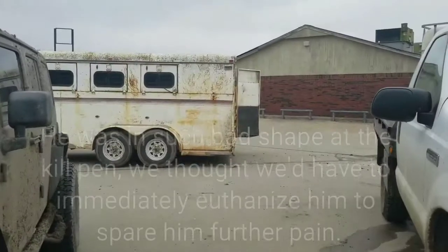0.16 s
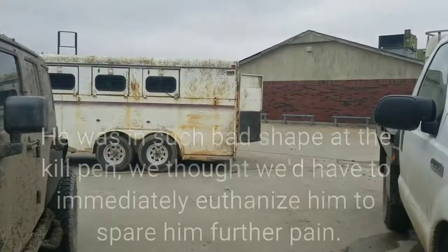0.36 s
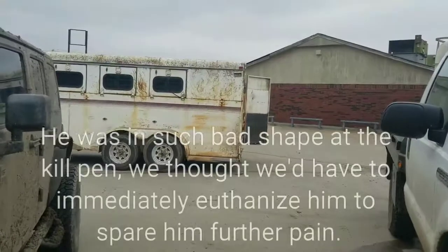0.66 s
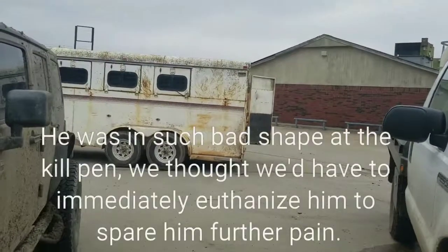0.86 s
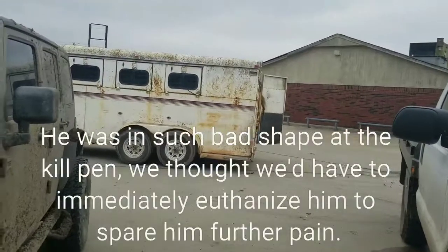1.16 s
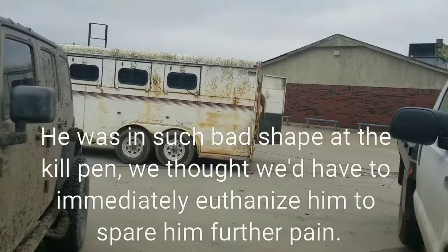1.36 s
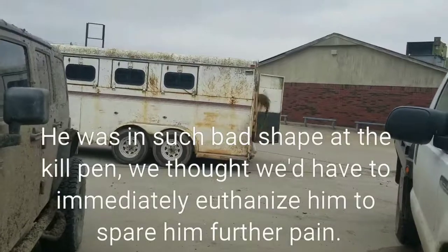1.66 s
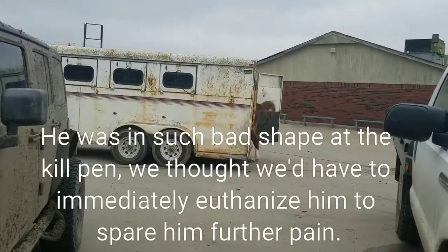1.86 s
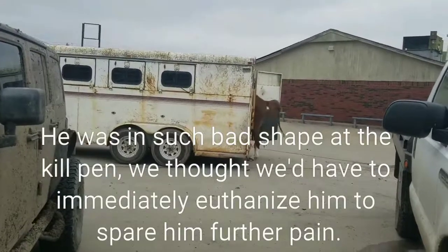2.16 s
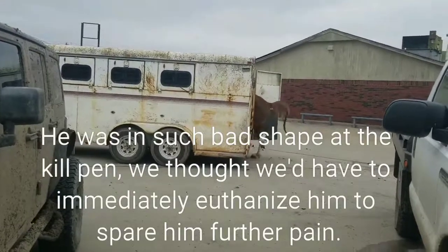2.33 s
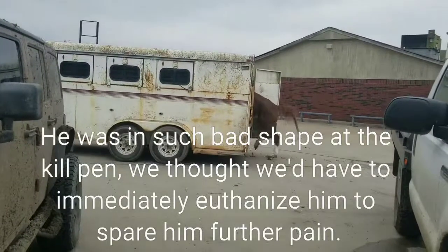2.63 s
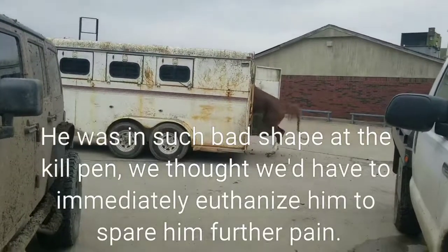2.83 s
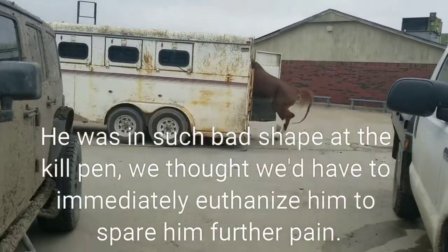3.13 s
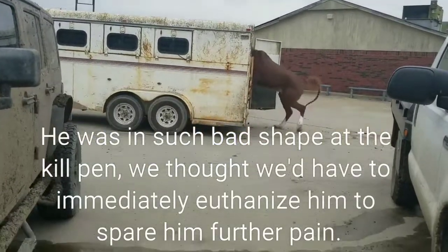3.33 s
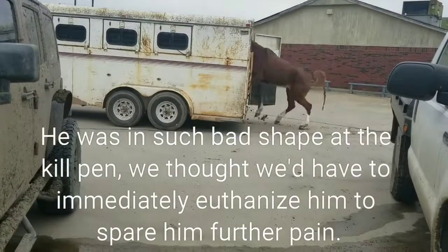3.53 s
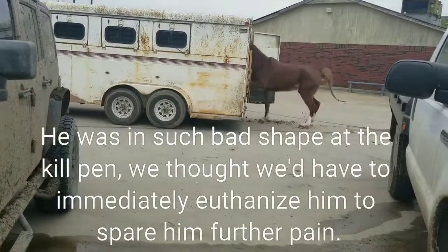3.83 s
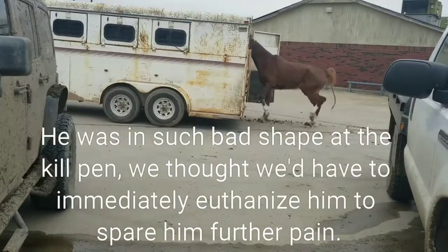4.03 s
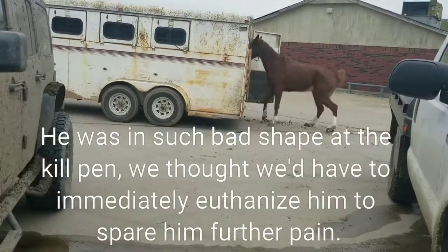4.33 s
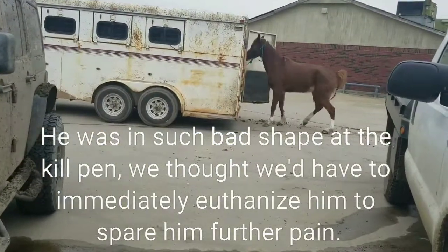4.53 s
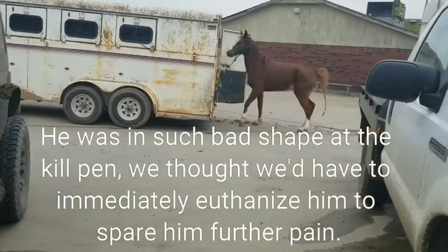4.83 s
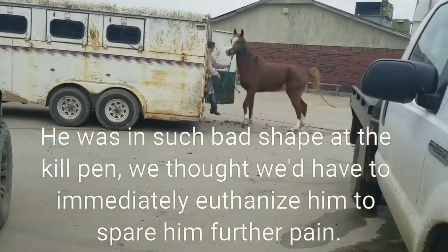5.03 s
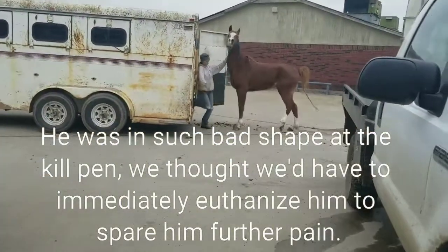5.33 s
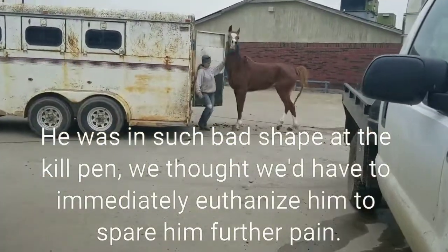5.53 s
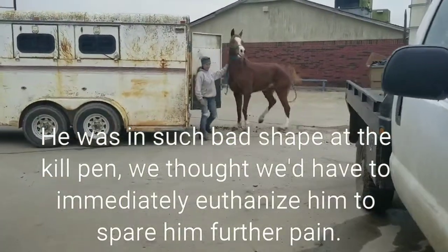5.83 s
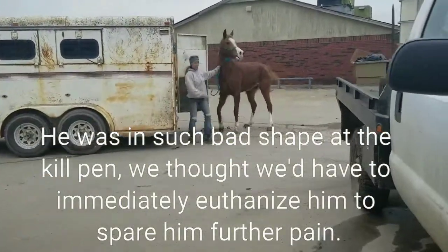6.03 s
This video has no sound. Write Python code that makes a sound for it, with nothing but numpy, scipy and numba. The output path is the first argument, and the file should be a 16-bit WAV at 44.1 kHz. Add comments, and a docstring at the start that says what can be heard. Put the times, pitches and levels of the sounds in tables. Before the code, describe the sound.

A handheld microphone stands some way off in a yard between parked vehicles. Hooves thump and rattle a steel trailer, the loudest blow at about one second, followed by sharp metal clanks and lighter steps. The horse cries out with a piercing whistle that breaks into raspy shakes and drops to a low snorting nicker. After a short metallic tick it whinnies again, higher and brighter, still calling at the end. Walls return brief echoes over soft low rumble.

```python
"""A paved yard: a horse backs out of a steel stock trailer. Hooves thump, steel clanks and squeals, and it whinnies twice.
Thumps are noise bursts in many bands plus panel tones; clanks are short coloured noise; the squeal is a wavering sine.
A whinny joins a high whistle with harmonics to slower, ragged fold pulses that rasp through throat and nose; the first
sinks into a nicker. Walls and parked trucks echo it all, over an outdoor rumble of noise and a distant engine's sine."""
import sys
import numpy as np
from scipy import signal
from scipy.fft import rfft, irfft, next_fast_len
from scipy.io import wavfile
from scipy.ndimage import uniform_filter1d
from numba import njit

SR = 44100
rng = np.random.default_rng(int(sys.argv[2]) if len(sys.argv) > 2 else 0)


def waveform_to_disk(signal):
    """Save audio, clipped to [-1, 1], as 16-bit WAV at the path in sys.argv[1]."""
    frames = np.transpose(np.atleast_2d(signal))
    scaled = np.clip(frames, -1, 1) * 32767
    samples = np.round(scaled).astype(np.int16)
    wavfile.write(sys.argv[1], SR, samples)


N = 273067
T = np.arange(N) / SR  # time in seconds


def undb(db):
    """Turn decibels into gain."""
    return 10 ** (np.asarray(db) / 20)


def unit(x):
    """Scale to an average (rms) level of 1."""
    return x / np.sqrt(np.mean(x ** 2) + 1e-18)


def steady(x):
    """Even out the slow swells, keeping the grain."""
    power = np.abs(uniform_filter1d(x ** 2, size=1800))
    return x / np.sqrt(power + 1e-12)


def curves(table):
    """Join each column of a table by straight lines in time."""
    s, *columns = np.transpose(table)
    return [np.interp(T, s, column) for column in columns]


def during(table):
    """A gate with soft edges, open over the time span of a table."""
    is_open = (T > table[0][0]) & (T < table[-1][0] + .01)
    return uniform_filter1d(1. * is_open, size=300)


def at(points, hz):
    """Read a curve of (Hz, value) points, with pitch on a log scale."""
    f, value = np.transpose(points)
    return np.interp(np.log(hz + 1), np.log(f), value)


def colour(x, points):
    """Filter a sound by a curve of (Hz, dB) points."""
    length = x.shape[-1]
    size = next_fast_len(length)
    gain = undb(at(points, np.fft.rfftfreq(size, 1 / SR)))
    return irfft(rfft(x, size) * gain, size)[..., :length]


def walk(rate):
    """Smooth random motion with spread 1; a higher rate (Hz) moves faster."""
    size = max(int(SR / rate), 2)
    smooth = uniform_filter1d(rng.standard_normal(N), size)
    return unit(uniform_filter1d(smooth, size))


def add(out, s, sound):
    """Mix a sound in at time s."""
    start = int(s * SR)
    out[..., start:start + sound.shape[-1]] += sound[..., :N - start]


def stereo_noise(count, wide_hz):
    """Noise that is alike left and right in the bass and much less alike in the treble."""
    mid, side = rng.standard_normal((2, count))
    side = colour(side, [(wide_hz / 16, -22), (wide_hz, -2), (wide_hz * 2, -1)])
    return np.array([mid + side, mid - side])


# The tone colour of the outdoor rumble. Each row: pitch in Hz, relative strength in dB.
RUMBLE_COLOUR = [(25, -22.5), (60, 0.5), (90, 2.5), (240, -0.5), (450, -14), (700, -11.5), (1270, -14),
                 (2000, -18.5), (3200, -32), (5000, -39), (7500, -41), (9000, -61.5), (14500, -42.5)]
# How loud the rumble is. Each row: time in seconds, level in dB before a slight random sway.
RUMBLE_LEVEL = [(0, -38), (.9, -41), (1.5, -42.5), (2.4, -43.5), (3.2, -43.5), (3.8, -43.5), (4.5, -44),
                (5.1, -49.5), (5.6, -46.5), (6.19, -46)]
# How loud the distant engine is. Each row: time in seconds, level in dB before a random sway.
DRONE_LEVEL = [(0, -43.5), (2.999, -45.5), (4.901, -66), (5.301, -50), (5.7, -39), (6.19, -44.5)]
DRONE_HZ = 76


def yard():
    """Outdoor rumble of coloured noise, with a wavering low sine for an engine droning far off."""
    rumble = unit(colour(stereo_noise(N, wide_hz=1585), RUMBLE_COLOUR))
    rumble = rumble * undb(curves(RUMBLE_LEVEL)[0] + 0.55 * walk(25))
    drone_hz = DRONE_HZ * (1 + 0.056 * walk(25))
    drone = np.sin(2 * np.pi * np.cumsum(drone_hz) / SR)
    drone = drone * undb(curves(DRONE_LEVEL)[0] + 1.4 * walk(11))
    return (rumble + drone) * undb(np.array([[.9], [-.9]]))  # a little louder on the left


# How loud the thin metallic squeal is. Each row: time in seconds, level in dB before a random sway.
SQUEAL_LEVEL = [(0, -54), (.3, -44), (.65, -74)]
SQUEAL_HZ = 5810


def squeal():
    """A faint sine with a wavering pitch that swells and dies away."""
    hz = SQUEAL_HZ * (1 + 0.0036 * walk(220))
    tone = np.sin(2 * np.pi * np.cumsum(hz) / SR)
    return tone * undb(curves(SQUEAL_LEVEL)[0] + 2 * walk(27)) * during(SQUEAL_LEVEL)


# Hoof blows on the trailer floor and the pavement.
# Each row: start in seconds, relative level in dB, brightness in dB an octave (tilting about 1000 Hz).
HOOF_BLOWS = [(.418, -31.5, -1), (.501, -38.5, -3.5), (1.016, -27, -5), (1.036, -17.5, 2),
              (1.048, -34, -15), (1.567, -32, 0), (1.614, -30.5, -3.5), (1.683, -33.5, 4.5),
              (1.776, -35, -1), (2.193, -35, -4.5), (2.291, -41.5, 4), (2.601, -36.5, -3),
              (2.842, -44.5, -5.5), (3.089, -33.5, -3.5), (3.323, -41, -7.5), (3.764, -32.5, 6)]
# How strongly the trailer body answers a blow. Each row: pitch in Hz, relative strength in dB.
BODY_COLOUR = [(40, -30), (70, 4), (130, 6.5), (280, 1), (600, 5.5), (1100, 5), (1800, -4), (2700, -31),
               (4500, -14.5), (7500, -70.5), (10000, -56.5), (15000, -43.5)]
# How long the body rings. Each row: pitch in Hz, seconds to fade by 60 dB.
BODY_FADE = [(60, 1), (200, 0.75), (600, 0.29), (1500, 0.17), (4000, 0.02), (12000, 0.25)]
# Distinct tones of the panels. Each row: pitch in Hz, relative strength in dB, seconds to fade by 60 dB.
PANEL_TONES = [(593.6, -8.5, 0.1), (662.3, -5.5, 0.17), (890, -5.5, 0.087), (1080, -17.5, 0.088),
               (1304, -3, 0.17), (1840, -9.5, 0.059)]


def hooves(panel_db, boom_db, crack_db, clatter_db):
    """Each blow sets the steel box rattling: dense modes that fade band by band, and a few distinct panel tones."""
    out, t = np.zeros((2, N)), T[:SR]
    centres = 45 * 2 ** (np.arange(17) / 2)  # half-octave bands, in Hz
    filters, fades = [], []
    for f in centres:
        edges = [f / 2 ** (1 / 4), f * 2 ** (1 / 4)]
        filters.append(signal.butter(2, edges, "band", fs=SR, output="sos"))
        t60 = at(BODY_FADE, f)
        # a quieter boom lingers twice as long
        fades.append(undb(-60 * t / t60) + undb(boom_db - 30 * t / t60))
    for s, db, bright_db in HOOF_BLOWS:
        noise = stereo_noise(len(t), wide_hz=1400)
        rattle = 0
        for f, band, fade in zip(centres, filters, fades):
            strength = undb(at(BODY_COLOUR, f) + bright_db * np.log2(f / 1000))
            rattle = rattle + strength * signal.sosfilt(band, noise) * fade
        ring = 0
        for f, g, t60 in PANEL_TONES:
            ring = ring + undb(g - 60 * t / t60) * np.sin(2 * np.pi * f * t) * rng.normal()
        clatter = undb(clatter_db * walk(240)[:SR])  # random unevenness
        crack = 1 + undb(crack_db - 60 * t / 0.0546)  # extra strength at the start
        contact = 1 - np.exp(-t / 0.00028)
        rattle = rattle / rattle[:, t < .02].std()
        ring = ring / ring[t < .02].std()
        add(out, s, undb(db) * contact * clatter * crack * (rattle + undb(panel_db) * ring))
    return out * undb(np.array([[1.0], [-1.0]]))  # a little louder on the left


# Steel fittings that clank and scrape.
# Each row: start in seconds, level in dB before fading, seconds to fade by 60 dB, brightness in dB an octave.
CLANK_HITS = [(.705, -15.5, 0.013, -8), (1.568, -31, 0.16, -4), (1.611, -11, 0.066, -4.5),
              (1.779, -40.5, 0.2, -1), (2.248, -51, .15, 12), (2.268, -37.5, 0.12, 2.5),
              (2.293, -38.5, 0.091, 3.5), (4.532, -21.5, .11, 3), (4.874, -47, 0.076, 3),
              (5.101, -36.5, 0.024, -3)]
# The tone colour of the steel. Each row: pitch in Hz, relative strength in dB before brightening.
STEEL_COLOUR = [(710, -37), (1200, -15), (1750, -11), (1940, -0.5), (3070, -2), (3900, 11), (5850, -3),
                (6300, 6.5), (7290, 5), (8170, -1.5), (14500, -7.5)]


def clanks():
    """Steel rings in short bursts: noise coloured with peaks, which starts fast and fades."""
    out, t = np.zeros(N), T[:SR // 2]
    for s, db, t60, bright_db in CLANK_HITS:
        tilted = [(f, g + bright_db * np.log2(f / 1000)) for f, g in STEEL_COLOUR]
        ring = unit(colour(rng.standard_normal(len(t)), tilted))
        add(out, s, ring * undb(db - 60 * t / t60) * (1 - np.exp(-t / .003)))
    return out


@njit
def band_pass(x, hz, width):
    """One resonance (a state-variable band-pass filter) whose centre may move."""
    y, band, low = np.empty(len(x)), 0., 0.
    for i in range(len(x)):
        g, k = np.tan(np.pi * hz[i] / SR), width / hz[i]
        v = (band + g * (x[i] - low)) / (1 + g * (g + k))
        band, low, y[i] = 2 * v - band, low + 2 * g * v, k * v
    return y


def resonate(x, hz, width):
    """Apply one moving resonance twice, for steep skirts."""
    return band_pass(band_pass(x, hz, float(width)), hz, float(width))


# Resonances of throat and nose: head inside the trailer, raised outside, and the slack throat of the nicker.
# Each row: pitch in Hz before trembling, width of each pass in Hz, relative strength in dB.
TRACT_INSIDE = [(1010, 140, -15), (1529, 700, -7), (2100, 190, 4.5), (2760, 368, -4), (3538, 2400, -6.5),
                (4680, 204, 3), (5930, 1450, -20)]
TRACT_OUTSIDE = [(1205, 264, -5.5), (1718, 300, 0), (2203, 237, 2), (3320, 510, -4.5), (4230, 740, -14.5),
                 (6520, 3400, -19)]
TRACT_NICKER = [(1090, 450, -1), (1898, 200, -0.5), (3175, 950, -1.5), (4700, 1455, -15)]


def throat(source, tract, wander):
    """Jaw and nostrils tremble, so each resonance wanders."""
    total = 0
    for k, (f, width, db) in enumerate(tract):
        hz = f * (1 + np.clip(wander * walk(3.5), -.2, .2))
        total = total + (-1) ** k * undb(db) * resonate(source, hz, width)
    return steady(total)


# Shakes of the voice, mostly six to ten a second. Each row: middle in seconds, length in seconds,
# whistle bend in Hz, whistle change in dB, nasal tone in dB before an overall gain.
SHAKES_FIRST = [(3.052, 0.049, -100, -3, -60), (3.15, 0.059, -220, -4, -48), (3.247, 0.054, -200, 0, -59),
                (3.342, 0.036, -165, 1, -48.5), (3.45, 0.044, -155, -6.5, -36.5),
                (3.563, 0.052, -140, -10.5, -30), (3.685, 0.052, -160, -5, -27),
                (3.822, 0.058, -220, -16, -22.5), (3.953, 0.074, -190, -19, -23),
                (4.068, .035, -88, 1, -28), (4.18, 0.069, 0, 0, -40.5), (4.34, 0.089, 0, 0, -33.5),
                (4.5, 0.083, 0, 0, -35), (4.68, .11, -15.5, 0, -39.5)]
SHAKES_SECOND = [(5.602, 0.06, 117.6, 4, -35.5), (5.722, 0.07, 143.9, 6.5, -33.5),
                 (5.87, 0.064, 164.5, -0.5, -35.5), (6.008, .072, 191.6, 5.5, -38),
                 (6.16, 0.044, 140, -7.5, -38.5)]
FOLD_DROP, FOLD_SAG_PER_S = .14, 1.7  # share the slow folds drop mid-shake, and how fast they keep sinking
FOLD_LAG_S = .008  # the folds follow a shake late
RECOVER_S = .04  # the whistle regains its pitch after a shake


def shaking(shakes, edge, slump_hz):
    """Smooth pushes bend the whistle, lower the folds and open the nose; with slump_hz, each leaves it flatter."""
    push, bend_hz, change_db, nasal, drop = np.zeros((5, N))
    for k, (s, length, hz, db, nose_db) in enumerate(shakes):
        shape = np.exp(-np.minimum(np.abs(2 * (T - s) / length), 10) ** edge)
        recovery = np.exp(-np.maximum(T - s - length / 2, 0) / RECOVER_S)
        after = (T > s) * (1 - shape) * recovery
        push += shape
        bend_hz += hz * shape - (k + 1) * slump_hz * after
        change_db += db * shape
        nasal += undb(nose_db) * shape ** 2
        held = uniform_filter1d(1. * (np.abs(T - s - FOLD_LAG_S) < .65 * length), size=500)
        drop += held * (FOLD_DROP + FOLD_SAG_PER_S * (T - s))
    return push, bend_hz, change_db, nasal, drop


# The arc of each whinny's whistle before it is shaken. Each row: time in seconds, pitch in Hz,
# relative level of the lowest tone in dB, relative level of the harmonics in dB.
CRY_FIRST = [(2.495, 1365, -18.5, -44.5), (2.575, 1588, -25.5, -31.5), (2.7, 1714, -15, -22),
             (2.86, 1775, -12.5, -15.5), (2.92, 1741, -17, -21), (3.0, 1707, -27, -22),
             (3.045, 1491, -23, -19), (3.2, 1325, -25.5, -32), (3.3, 1534, -24, -20),
             (3.41, 1752, -15, -20.5), (3.52, 1804, -13.5, -17), (3.755, 1847, -17.5, -24),
             (3.886, 1722, -14.5, -26.5), (4.02, 1595, -13, -28.5), (4.1, 1501, -44, -65)]
CRY_SECOND = [(5.2, 1234, -53, -75), (5.24, 1660, -37.5, -63), (5.265, 1781, -18.5, -44),
              (5.305, 1809, -19, -50), (5.35, 1827, -40, -59), (5.46, 1866, -23.5, -35.5),
              (5.68, 1928, -16.5, -56), (5.82, 1884, -18.5, -42), (6.07, 1864, -28, -62),
              (6.19, 1927, -19, -56)]
# How the throat colours the whistle's harmonics. Each row: pitch in Hz, relative strength in dB.
HARMONIC_COLOUR = [(2150, 15.5), (2450, -8), (2850, 4.5), (3500, 7.5), (4600, 6), (5300, -6.5),
                   (7000, -2.5), (8700, -17.5), (10500, -19.5), (14000, -29)]
ONSET_S = 0.011  # the whistle starts to speak
DULLS_AFTER_S, DULLING_DB_PER_S = 0.93, 2.5  # late in a call the harmonics tilt: rate per harmonic step


def whistle(cry, bend_hz, change_db, fold_phase, rough, jitter, coupling, shimmer, patchy_db):
    """The high source; slow folds shake its pitch and strength, adding sidebands, and roughness breaks up harmonics."""
    hz, first_db, harmonics_db = curves(cry)
    hz = (hz + bend_hz) * (1 + 0.0023 * walk(73.0) + jitter * rough * walk(527))
    phase = 2 * np.pi * np.cumsum(hz) / SR + coupling * rough * np.sin(fold_phase)
    elapsed = T - cry[0][0]
    dull_db = DULLING_DB_PER_S * np.clip(elapsed - DULLS_AFTER_S, 0, 1)
    upper = 0
    for k in range(2, 9):
        level_db = at(HARMONIC_COLOUR, k * hz) - (k - 3.5) * dull_db + patchy_db * rough * walk(52)
        upper = upper + undb(level_db) * np.sin(k * phase)
    tone = np.sqrt(2) * (undb(first_db) * np.sin(phase) + undb(harmonics_db) * upper) * undb(change_db)
    onset = np.clip(elapsed / ONSET_S, 0, 1)
    unsteady = 1 + rough * (shimmer * walk(250) + coupling * np.cos(fold_phase))
    return tone * unsteady * onset * during(cry)


# The slow folds and the breath through each whinny. Each row: time in seconds, pitch in Hz before shaking,
# roughness from 0 to 1, relative rasp level in dB, relative air hiss level in dB.
EFFORT_FIRST = [(2.49, 597, 0.13, -63, -91), (2.601, 604.3, 0.09, -41.5, -40),
                (2.98, 595, 0.17, -45.5, -38), (3.052, 631.3, 0.47, -40.5, -51),
                (3.301, 607, 0.43, -46, -46), (3.5, 590.6, 0.43, -33.5, -35),
                (4.04, 589.5, 0.45, -35, -36.5), (4.11, 289.4, 0.71, -44.5, -41.5),
                (4.17, 566.8, .55, -39.5, -37), (4.25, 260.3, 0.82, -46, -39),
                (4.36, 134.3, .9, -44.5, -40), (4.55, 100.5, 0.86, -51.5, -44),
                (4.7, 70.47, 0.61, -62.5, -55), (4.85, 64.8, 0.26, -115, -65.5)]
EFFORT_SECOND = [(5.13, 200, .9, -67, -60), (5.19, 489, .7, -48, -51), (5.25, 612.6, 0.5, -47, -69),
                 (5.299, 575.7, 0.36, -37.5, -38), (5.36, 610, 0.49, -35.5, -75),
                 (5.509, 568.2, 0.53, -31, -58), (5.8, 601, 0.28, -32.5, -49.5),
                 (6.08, 624.7, 0.3, -39, -54.5), (6.19, 591, 0.49, -37.5, -54.5)]
# The nasal tone that carries on between shakes. Each row: time in seconds, relative level in dB.
NASAL_FIRST = [(3.0, -51), (3.87, -85), (4.0, -45), (4.13, -30), (4.28, -35), (4.6, -45), (4.85, -58.5)]
NASAL_SECOND = [(5.13, -55), (5.19, -40), (5.25, -61.5), (5.53, -42.5), (5.8, -48), (6.19, -48)]
# The tone colour of air through the nostrils. Each row: pitch in Hz, relative strength in dB.
AIR_COLOUR = [(3000, -6), (6000, 2.5), (7600, 2), (8800, -9), (10500, 1), (14500, -5)]
NOSE_HZ, NICKER_HZ = 468, 359  # nose resonance in the full call and in the nicker
CLEARING = .6  # a shake steadies the folds by this share
CLOSURE_JITTER_S = .00009  # base scatter of the moment the folds close, before the push scales it


def whinny(cry, effort, nasal, shakes, tract, whistle_db, nasal_db, rasp_db, air_db,
           shake_rasp_db, shake_air_db, jitter, coupling, shimmer, voiced):
    """Uneven fold pulses ring the nose; with the air they chop they rasp through the throat, under the whistle."""
    hz, rough, rasp_level, air_level = curves(effort)
    push, bend_hz, change_db, nose_level, drop = shakes
    hz = hz * np.clip(1 - drop, .5, 2)
    relaxed = np.clip((460 - hz) / 220, 0, 1)  # how far the call has sunk into a nicker
    uneven = rough * (1 - CLEARING * push * (1 - relaxed))
    cycles = np.cumsum(hz * np.exp(0.27 * uneven ** 2 * walk(300))) / SR
    # scattered closing leaves the low tone clear and smears the upper partials
    cycles = cycles + hz * CLOSURE_JITTER_S * (.5 + push) * walk(445.3)

    # one pulse at each closure, split between neighbouring samples
    steps = np.floor(cycles) + np.minimum(cycles % 1 * SR / hz, 1)
    pulses = np.diff(steps, prepend=0) * undb(5.8 * uneven * walk(400))
    # air is strongest just after each closure
    chopping = .6 - .25 * relaxed + np.exp(-(cycles % 1) / .5)
    puffs = unit(rng.standard_normal(N) * chopping)

    nose_hz = NOSE_HZ + (NICKER_HZ - NOSE_HZ) * relaxed
    nose_call = steady(resonate(pulses, nose_hz, 260))
    nose_nicker = steady(resonate(pulses, nose_hz, 303))
    nose = (1 - relaxed) * nose_call + relaxed * nose_nicker

    voice_share = voiced * (1 - .5 * np.maximum(relaxed, np.minimum(push, 1)))
    source = voice_share * steady(pulses) + (.4 + 1.3 * rough) * puffs
    rasp_call = throat(source, tract, wander=.018)
    rasp_nicker = throat(source, TRACT_NICKER, wander=.06)
    rasp = np.sqrt(1 - relaxed) * rasp_call + np.sqrt(relaxed) * rasp_nicker
    air = unit(colour(puffs, AIR_COLOUR))
    # slack nostrils flap, breaking the rasp into bursts
    flutter = undb((2.5 + 1.2 * relaxed) * walk(110))

    breathy = nose * (nose_level + undb(curves(nasal)[0])) * undb(nasal_db)
    breathy = breathy + flutter * rasp * undb(rasp_level + rasp_db + shake_rasp_db * push)
    breathy = breathy + air * undb(air_level + air_db + shake_air_db * push)
    # while the whistle is pure, the slow folds hardly stir and little air hisses
    stirred = np.minimum(rough / .28, 1)
    high = whistle(cry, bend_hz, change_db, 2 * np.pi * cycles, rough, jitter,
                   coupling * stirred, shimmer, patchy_db=5)
    return stirred * breathy * during(effort) + undb(whistle_db) * high


def place(x, lag_ms, pan_db, shadow_db):
    """Set a source in stereo: the right side is shifted in time and its treble shaded; pan_db favours the left."""
    right = colour(x, [(2500, 0.0051), (8000, -shadow_db)])
    right = np.interp(T - lag_ms / 1000, T, right)
    return np.array([x * undb(pan_db / 2), right * undb(-pan_db / 2)])


def echoes(x, t60, wet_db, treble_db):
    """Scattered, fading reflections from trailer, trucks and the building, different on each side."""
    t = T[:SR]
    scatter = rng.standard_normal((2, len(t))) ** 3 * undb(-60 * t / t60) * (t > .004)
    scatter = scatter / np.sqrt(np.sum(scatter ** 2, axis=1, keepdims=True))
    response = colour(scatter, [(100, -18), (400, 9), (1500, 9.5), (3500, 4.0), (12000, treble_db)])
    return undb(wet_db) * signal.fftconvolve(x[None], response, axes=1)[:, :N]


def scene():
    """Hooves and fittings, one whinny from the trailer and one in the open."""
    first = whinny(CRY_FIRST, EFFORT_FIRST, NASAL_FIRST, shaking(SHAKES_FIRST, edge=2.715, slump_hz=0),
                   TRACT_INSIDE, whistle_db=-6.5, nasal_db=2, rasp_db=8, air_db=1.5, shake_rasp_db=7.0,
                   shake_air_db=-0.5, jitter=0.014, coupling=0.11, shimmer=0.66, voiced=1.5)
    second = whinny(CRY_SECOND, EFFORT_SECOND, NASAL_SECOND, shaking(SHAKES_SECOND, edge=6.8, slump_hz=36.73),
                    TRACT_OUTSIDE, whistle_db=3.5, nasal_db=3, rasp_db=7.5, air_db=4.0, shake_rasp_db=3,
                    shake_air_db=17, jitter=0.01, coupling=0.019, shimmer=0.23, voiced=1.5)
    trailer = first + clanks() + squeal()
    blows = hooves(panel_db=-6.5, boom_db=-15, crack_db=-6, clatter_db=2.12)
    direct = place(trailer, lag_ms=0.38, pan_db=2.5, shadow_db=15)
    direct = direct + place(second, lag_ms=-0.044, pan_db=-2.5, shadow_db=12) + blows
    reflected = trailer + .6 * second + blows.mean(0)
    return direct + echoes(reflected, t60=0.24, wet_db=-12, treble_db=6.0) + yard()


TOP_HZ = 14700  # highest pitch let through


def record(dry):
    """The recorder rounds the highest peaks and cuts the top."""
    rounded = dry / (1 + np.abs(dry) ** 8) ** (1 / 8)
    low_pass = signal.ellip(10, .2, 80, TOP_HZ, fs=SR, output="sos")
    return signal.sosfilt(low_pass, rounded)


dry = scene()
out = record(dry)
waveform_to_disk(out)
```